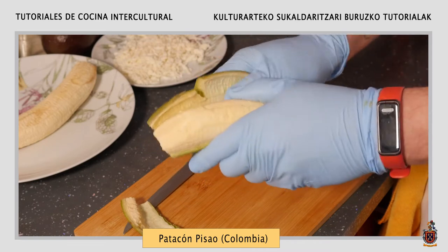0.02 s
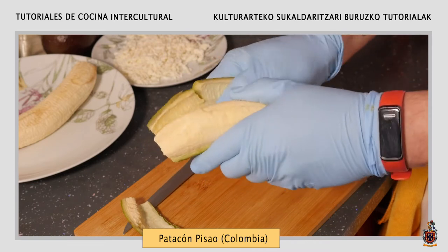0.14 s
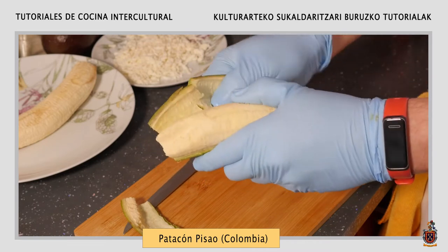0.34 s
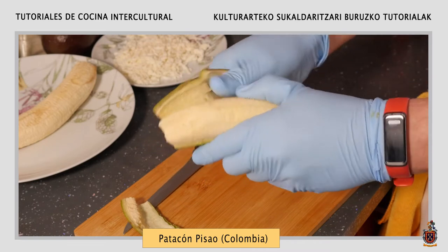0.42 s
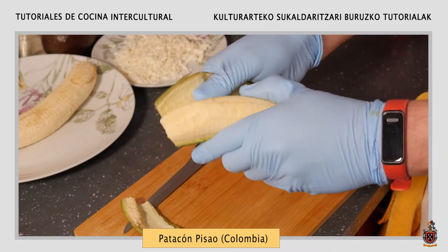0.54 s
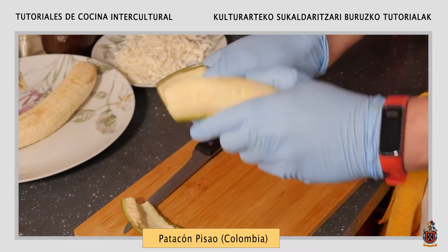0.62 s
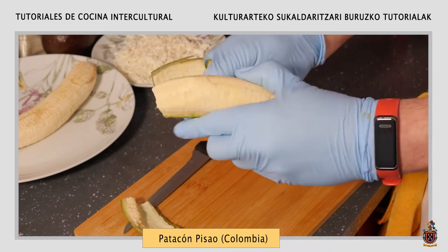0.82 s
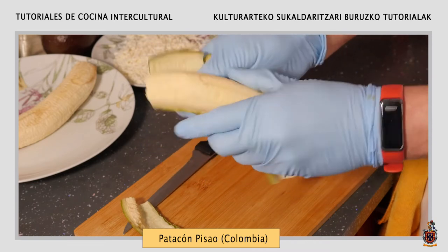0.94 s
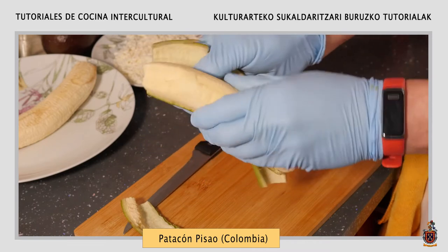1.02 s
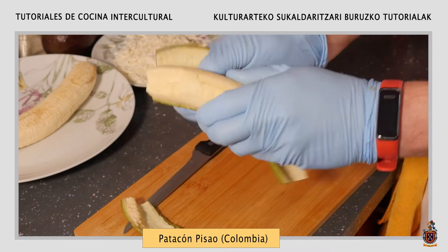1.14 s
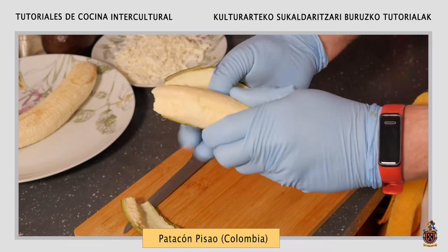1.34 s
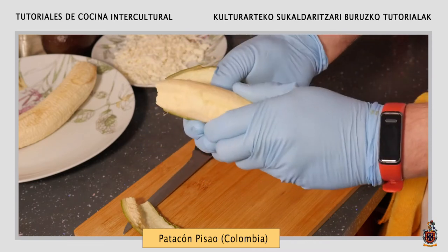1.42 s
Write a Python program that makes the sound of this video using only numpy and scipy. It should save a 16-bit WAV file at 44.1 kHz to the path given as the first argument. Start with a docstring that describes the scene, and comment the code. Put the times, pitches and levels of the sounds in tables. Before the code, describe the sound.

Plantain peel tearing in dry crackles and one hard hollow snap, close up, faint room hum

```python
"""Small kitchen: gloved fingers peel a plantain over room air and a faint appliance hum.
The stiff skin cracks, then snaps hard; strips tear off in rushes of tiny fibre breaks and sharp cracks.
Breaks are filtered clicks and bursts, tearing is filtered random impulses, the snapped skin rings in
decaying sines. The gloves rub dully: unsteady low sines in filtered noise. Mono."""
import sys
import numpy as np
from scipy import signal
from scipy.fft import rfft, irfft, next_fast_len
from scipy.io import wavfile
from scipy.ndimage import map_coordinates

SR = 44100
rng = np.random.default_rng(int(sys.argv[2]) if len(sys.argv) > 2 else 0)


def unload_audio(sound):
    """Save the sound as a 16-bit wav file, at the path given as the first command line argument."""
    columns = np.transpose(np.atleast_2d(sound))
    # keep every value between -1 and 1, then stretch to whole-number steps
    steps = np.round(np.clip(columns, -1, 1) * 32767)
    wavfile.write(sys.argv[1], SR, steps.astype(np.int16))


N = 66150

# room air spectrum: f/Hz, level/dB
AIR_SPECTRUM = [(20, -58), (33, -64), (50, -45), (70, -55), (110, -46), (180, -48), (320, -44), (420, -53),
                (850, -49.5), (1300, -50), (1800, -56), (3500, -57), (5500, -62), (9500, -64),
                (12500, -72.5), (15500, -81)]
# appliance hum: f/Hz, rms level/dB
HUM_TONES = [(49.5, -79.5), (100, -73), (329, -66.5), (684, -77.5), (873, -74.5)]
# rubber gloves juddering on fruit: middle t/s, 1/e half-width/s, judder level/dB, judder f/Hz, rustle level/dB
GLOVE_RUBS = [(0.043, 0.057, -56, 272, -58), (0.11, 0.012, -51.5, 287.5, -60),
              (0.168, 0.069, -64.5, 239, -57), (0.235, .008, -55, 129.7, -48.5),
              (0.243, 0.021, -50, 280, -48), (0.336, 0.093, -68.5, 222, -62),
              (1.332, 0.022, -63, 479, -57.5), (1.366, 0.041, -61, 218, -60.5),
              (1.457, 0.054, -67, 263.4, -63.5)]
# rustle spectrum: f/Hz, level/dB
RUSTLE_SPECTRUM = [(60, -12), (150, -9), (330, 7.5), (600, -2), (1200, -1.5), (2000, -8.5), (4000, -19),
                   (12000, -36)]
# fibre-tearing pulls: resonance f/Hz, lift/dB, tilt/(dB/octave), [(t/s, level/dB before room)]
TEAR_PULLS = [(11700, 1.6, 0.14, [(.02, -74), (.07, -63), (.11, -48.5), (.14, -54), (.172, -59),
              (.21, -57)]), (1200, 5.6, -2.4, [(.212, -46), (.235, -44), (.265, -53.5), (.30, -80),
              (.4, -62), (.56, -75)]), (4210, 6.6, 0.45, [(.565, -70), (.595, -55.5), (.617, -44),
              (.637, -35), (.646, -48.5), (.668, -44), (.69, -57.5), (.72, -72)]),
              (3240, 8.2, -0.42, [(1.09, -72), (1.125, -57.5), (1.15, -64.5), (1.22, -47), (1.25, -60),
              (1.3, -68)]), (6200, 2.8, 1.9, [(1.40, -82), (1.425, -58), (1.47, -70), (1.5, -50)])]
# tearing spectrum: f/Hz, level/dB
TEAR_SPECTRUM = [(100, -15.5), (350, 2), (650, 1), (1400, 7), (1800, 1), (3400, -1.5), (4150, 2),
                 (5100, -2), (6400, 3), (8000, 0.5), (10000, 3), (13000, 0), (15500, -6.5)]
# cracks at the skin's edge: t/s, level/dB, splinter decay/s, tilt/(dB/octave), resonance f/Hz, lift/dB
EDGE_CRACKS = [(0.0672, -20, 0.00036, 6.5, 7000, 3), (.1151, -10, .001, 3.5, 6200, 2),
               (.1306, -13.5, 0.00041, -5.5, 6000, 2), (.137, -12, 0.0012, -4.5, 3330, -0.5),
               (0.142, -9, 0.00047, 0, 11000, 12), (0.1573, -15, 0.0013, -5, 2090, 12),
               (.1836, 0.5, 0.00069, 0, 8050, 8), (.2288, 3, .002, 2.5, 13000, 3),
               (0.2337, 1.5, .002, -5.5, 4200, 6.5), (0.599, -7, 0.00046, 0.5, 10500, 10),
               (0.6205, -8, .0006, 5, 4200, 7), (.635, 0.5, 0.0023, 5, 6700, 7),
               (0.6391, -2.5, 0.0016, 1.5, 4080, 12.5), (1.049, -19.5, 0.0034, -4.5, 3500, 13),
               (1.1266, -16.5, 0.0016, 3, 6200, 7), (1.1554, 2, 0.00097, -0.5, 6200, 5.5),
               (1.1702, 1, .0012, -1.5, 4600, 9), (1.1941, 0.5, 0.00067, -1.5, 6100, 6),
               (1.2014, -8, .0004, 0, 6070, 4), (1.204, 5, 0.0022, 0, 6000, 4),
               (1.207, -5.5, 0.00073, -4, 10500, 6), (1.2292, 4.5, 0.00096, 2.5, 6200, 11.5),
               (1.233, -3.5, .002, -2.5, 6300, 7), (1.286, -20, .0005, 3, 12500, 7),
               (1.4608, -18, 0.00033, 7, 6500, 10), (1.4912, -9.5, 0.00055, 6, 6130, 5)]
# crack spectrum: f/Hz, level/dB
CRACK_SPECTRUM = [(100, -27), (400, -22), (800, -12), (1300, -13), (1800, -16.5), (2500, -14),
                  (3250, -10.5), (3900, -16.5), (5100, -14.5), (6150, -10), (7300, -16), (9500, -12),
                  (12000, -20.5), (15500, -37)]
# snaps through thick skin: t/s, level/dB
SKIN_SNAPS = [(.2144, 0), (.2292, -13.5), (0.2358, -16.5), (.6293, -15.5)]
# snap spectrum: f/Hz, level/dB
SNAP_SPECTRUM = [(60, -43), (200, -17), (450, 5.5), (750, 13), (1030, 8.5), (1280, 12), (1560, 6),
                 (2000, 8), (3000, -0.5), (4000, -3.5), (6000, -13), (7700, 0), (9500, -11), (12000, -5.5),
                 (14500, -25)]
# snapped skin's modes: f/Hz, level/dB re snap, t60/s
SKIN_MODES = [(425, -40, .07), (717.3, -36.5, 0.1), (925, -33, 0.097), (1186, -29.5, 0.15),
              (1353, -33, 0.087), (1697, -43, 0.11), (2090, -50, 0.053)]
# room decay: f/Hz, t60/s
ROOM_DECAY = [(200, 0.28), (1000, .24), (5000, 0.24), (14000, .15)]

HUM_WAVER = 0.23  # size scatter; half the phase drift/rad
JUDDER_ROUGH, JUDDER_DRIFT_RAD = 0.39, 0.78  # size scatter; phase drift
FIBRES_PER_S, FIBRE_SPREAD_DB, TEAR_WIDTH_OCT = 5000, 3.5, .12
FIRST_BREAK, SPLINTER_NORM, CRACK_WIDTH_OCT = .38, 0.73, .15
SNAP_ALLPASS_HZ, RING_ATTACK_S = 2250, 0.0021
NEAR_T60_S, ROOM_BUILDUP_S = 0.026, 0.0056
NEAR_DB, ROOM_DB = -6.5, -9  # re direct at wet_db = 0
TOP_HZ = 15750
T = np.arange(N) / SR
SIZE = next_fast_len(N + SR // 2)
HZ = np.fft.rfftfreq(SIZE, 1 / SR)


def amp(db):
    """Decibels to gain."""
    return 10 ** (np.asarray(db) / 20)


def unit(x):
    """Scale to rms 1."""
    return x / np.sqrt(np.mean(x ** 2) + 1e-20)


def along(points, hz):
    """Interpolate (Hz, value) points on a log-frequency axis."""
    f, v = np.transpose(points)
    return np.interp(np.log(hz + 1), np.log(f + 1), v)


def colour(x, points, tilt=0, peak=(1000, 0, 1), size=4096):
    """Minimum-phase filter: spectrum, tilt (dB/octave about 5 kHz), one peak (Hz, dB, width in octaves)."""
    hz = np.fft.rfftfreq(size, 1 / SR)
    octaves = np.log2(np.maximum(hz, 1000) / 5000)  # tilt flattens below 1 kHz
    centre, lift, width = peak
    bump = lift * np.exp(-(np.log2((hz + 1) / centre) / width) ** 2)
    db = along(points, hz) + tilt * octaves + bump
    # fold the cepstrum to make the filter causal
    cepstrum = irfft(np.log(amp(db)))
    cepstrum[1:size // 2] *= 2
    cepstrum[size // 2 + 1:] = 0
    impulse = irfft(np.exp(rfft(cepstrum)))
    return signal.fftconvolve(x, impulse)[:len(x)]


def level(rows):
    """Gain per sample from (s, dB) rows, silent outside them."""
    return amp(np.interp(T, *np.transpose(rows), left=-np.inf, right=-np.inf))


def wobble(knots_per_s):
    """Smooth random curve."""
    knots = rng.standard_normal(int(N * knots_per_s / SR) + 4)
    return map_coordinates(knots, [T * knots_per_s])


def add(track, s, x):
    """Mix x into the track at time s."""
    part = track[round(s * SR):][:len(x)]
    part += x[:len(part)]


def kitchen(x, wet_db=0):
    """Direct sound, quick reflections off hands and worktop, and the room's short tail."""
    hz, t, bins = signal.stft(rng.standard_normal(SR // 2), SR, nperseg=256)
    decay = amp(-60 * t / along(ROOM_DECAY, hz)[:, None])
    tail = signal.istft(bins * decay, SR, nperseg=256)[1]
    t = np.arange(len(tail)) / SR
    tail = tail * (1 - np.exp(-(t / ROOM_BUILDUP_S) ** 2))
    near = rng.standard_normal(len(t)) * amp(-60 * t / NEAR_T60_S) * (t > .0008)
    walls = amp(ROOM_DB) * tail / np.linalg.norm(tail)
    walls += amp(NEAR_DB) * near / np.linalg.norm(near)
    return x + amp(wet_db) * signal.fftconvolve(x, walls)[:len(x)]


def background():
    """Room air as filtered noise; appliance hum as sines wavering slightly in size and phase."""
    out = colour(rng.standard_normal(N), AIR_SPECTRUM)
    for hz, db in HUM_TONES:
        size = 1 + HUM_WAVER * wobble(12)
        phase = 2 * np.pi * hz * T + 2 * HUM_WAVER * wobble(8.85)
        out += amp(db) * unit(size * np.sin(phase))
    return out


def gloves():
    """As the grip shifts, rubber sticks and slips on the fruit: a dull, uneven groan in a soft rustle."""
    out = np.zeros(N)
    for s, half_s, judder_db, hz, rustle_db in GLOVE_RUBS:
        size = 1 + JUDDER_ROUGH * wobble(80)
        phase = 2 * np.pi * hz * T + JUDDER_DRIFT_RAD * wobble(50.06)
        judder = unit(size * np.sin(phase))
        rustle = unit(colour(rng.standard_normal(N), RUSTLE_SPECTRUM))
        swell = np.exp(-((T - s) / half_s) ** 2)
        out += (amp(judder_db) * judder + amp(rustle_db) * rustle) * swell
    return out


def tearing():
    """In each pull, many tiny fibres of uneven size part as the skin leaves the flesh."""
    out = np.zeros(N)
    for hz, lift_db, tilt, effort in TEAR_PULLS:
        breaks = rng.random(N) < FIBRES_PER_S / SR
        spread = np.clip(rng.standard_normal(N), -2, 2)
        sizes = amp(FIBRE_SPREAD_DB * spread) * rng.choice([-1, 1], N)
        fibres = colour(breaks * sizes, TEAR_SPECTRUM, tilt, (hz, lift_db, TEAR_WIDTH_OCT))
        out += kitchen(unit(fibres) * level(effort))
    return out


def cracks():
    """One sharp break, then brief decaying splintering; the resonance is in the direct sound only."""
    out, t = np.zeros(N), T[:SR // 3]
    for s, db, splinter_s, tilt, hz, lift_db in EDGE_CRACKS:
        burst = rng.choice([-1, 1], len(t)) * np.exp(-t / splinter_s)
        burst *= SPLINTER_NORM / np.linalg.norm(burst)
        burst[0] = -FIRST_BREAK
        plain = colour(burst, CRACK_SPECTRUM, tilt)
        direct = colour(burst, CRACK_SPECTRUM, tilt, (hz, lift_db, CRACK_WIDTH_OCT))
        echoes = kitchen(plain, wet_db=0.6) - plain
        add(out, s, amp(db) * (direct + echoes))
    return out


def snaps():
    """The skin gives way in one push and rings with a hollow knock."""
    out, t = np.zeros(N), T[:SR // 2]
    click = colour(1. * (t == 0), SNAP_SPECTRUM)
    # all-pass: the push lags below the corner
    pole = np.exp(-2 * np.pi * SNAP_ALLPASS_HZ / SR)
    push = signal.lfilter([pole, -1], [1, -pole], click)
    ring = sum(amp(db - 60 * t / t60_s) * np.sin(2 * np.pi * hz * t) for hz, db, t60_s in SKIN_MODES)
    ring = ring * (1 - np.exp(-t / RING_ATTACK_S))
    for s, db in SKIN_SNAPS:
        add(out, s, amp(db) * (ring + kitchen(push, wet_db=-1.0)))
    return out


def scene():
    """Peeling over the kitchen's quiet, mono."""
    return (background() + gloves() + tearing() + cracks() + snaps())[None]


def record(dry):
    """Brickwall low-pass at TOP_HZ."""
    return irfft(rfft(dry, SIZE) * (HZ < TOP_HZ), SIZE)[:, :N]


dry = scene()
out = record(dry)
unload_audio(out)
```